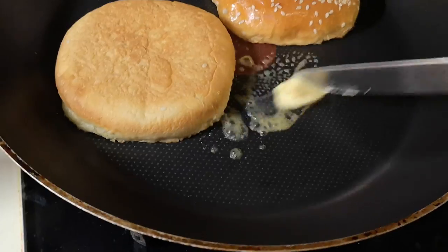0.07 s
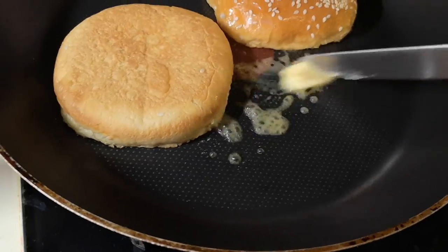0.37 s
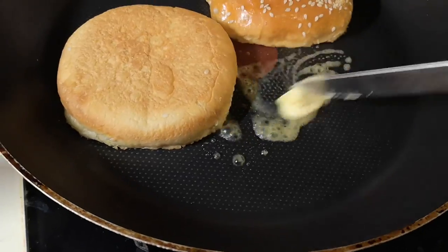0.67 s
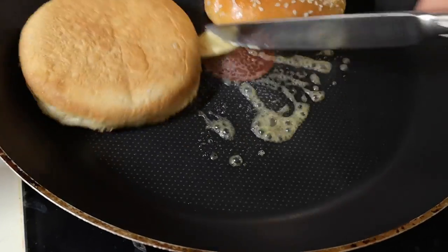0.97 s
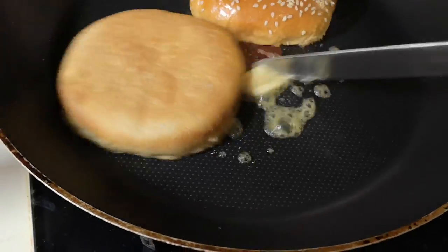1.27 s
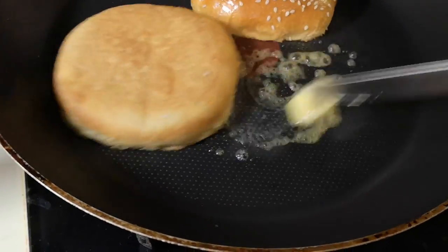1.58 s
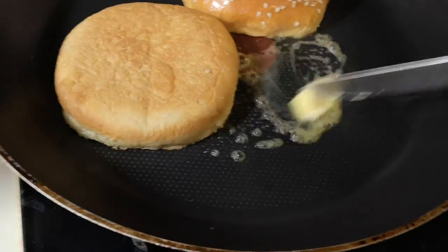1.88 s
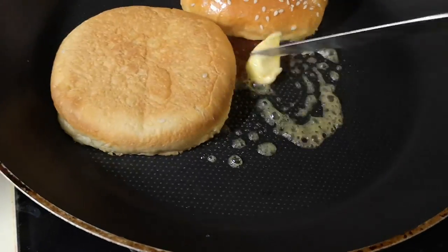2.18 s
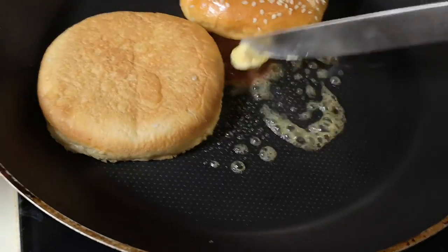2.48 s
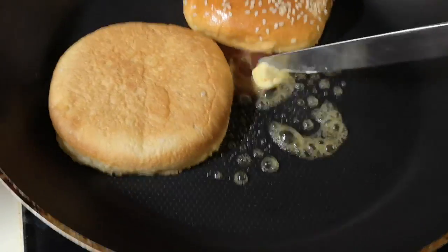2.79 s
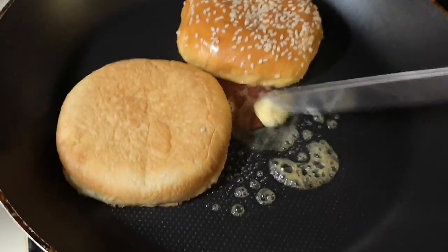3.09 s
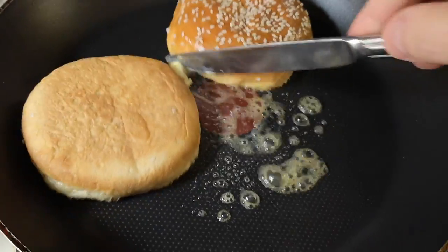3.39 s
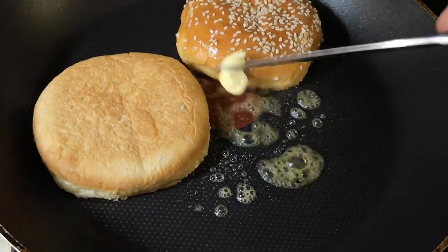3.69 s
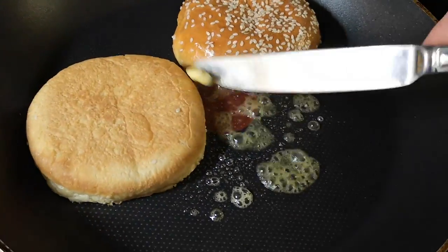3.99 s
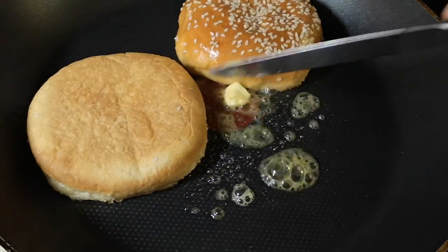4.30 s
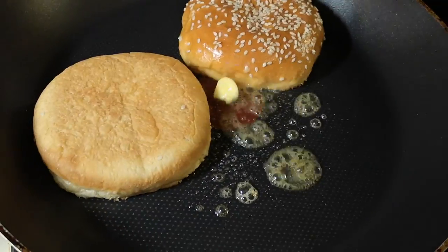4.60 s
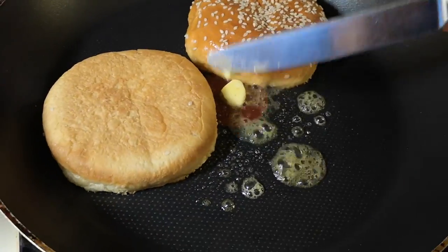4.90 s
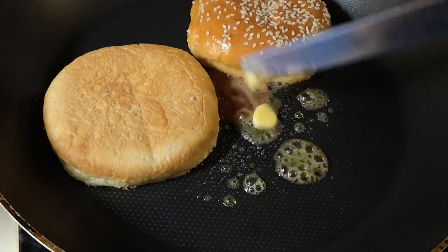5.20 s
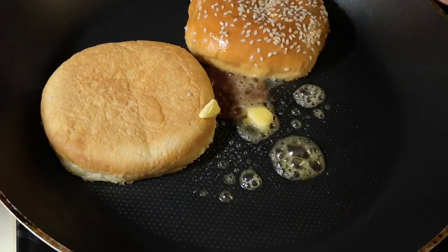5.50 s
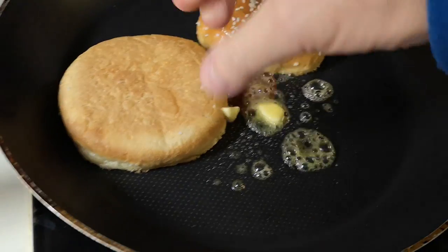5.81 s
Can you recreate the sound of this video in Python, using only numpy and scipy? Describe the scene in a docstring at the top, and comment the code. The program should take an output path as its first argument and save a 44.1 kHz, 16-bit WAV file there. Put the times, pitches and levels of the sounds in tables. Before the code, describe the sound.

Heard from close by in stereo, butter bubbles and crackles in a hot frying pan, flaring slightly as it is pushed around, with small irregular pops throughout. The low hum and airy fan of an electric hob fill the small kitchen underneath. In the second half come two quick knocks of a knife on the pan, ringing only briefly, after which the frying settles a little and a very low rumble rises and fades.

```python
"""Butter frying in a pan

A small kitchen, a stereo microphone close to an electric hob. Butter sizzles as a knife pushes it
about between two buns: tiny steam bubbles burst in the fat and bigger ones spit. Underneath, the hob
hums, its cooling fan blows and a deep rumble swells once. Twice the knife work knocks the pan."""
import sys
import numpy as np
from scipy import signal
from scipy.fft import rfft, irfft, next_fast_len
from scipy.io import wavfile

SR = 44100
rng = np.random.default_rng(int(sys.argv[2]) if len(sys.argv) > 2 else 0)


def put_to_file(sound):
    """Save the sound as 16-bit audio at rate SR, in the file named by the first command-line argument."""
    columns = np.atleast_2d(sound).T  # one column per channel
    safe = np.clip(columns, -1, 1)
    whole_steps = np.round(safe * 32767)
    wavfile.write(sys.argv[1], SR, whole_steps.astype(np.int16))


N = 257632
T = np.arange(N) / SR


def from_db(db):
    """Decibels to gain."""
    return 10 ** (np.asarray(db) / 20)


def rms_one(x):
    """Scale to rms 1."""
    return x / np.sqrt(np.mean(x ** 2) + 1e-20)


def in_time(rows):
    """One curve for each column after the time, its points joined by straight lines."""
    times, *columns = np.transpose(rows)
    return [np.interp(T, times, column) for column in columns]


def panned(pan_db):
    """Left and right gains of constant power; pan is left minus right in dB."""
    gains = from_db(np.array([[.5], [-.5]]) * pan_db)
    return gains / np.sqrt(np.mean(gains ** 2, axis=0))


def coloured(x, spectrum):
    """Shape a sound by a smooth spectrum of (Hz, dB) points; rms 1."""
    hz, db = np.transpose(spectrum)
    size = next_fast_len(N)
    log_hz = np.log(np.maximum(np.fft.rfftfreq(size, 1 / SR), 1))
    gain = from_db(np.interp(log_hz, np.log(hz), db, left=-100, right=-100))
    return rms_one(irfft(rfft(x, size) * gain, size)[..., :N])


def drift(rate_hz):
    """A slow random wander of rms 1, drawn every 100 samples."""
    pole = np.exp(-200 * np.pi * rate_hz / SR)
    steps = rng.standard_normal(N // 100 + 1002)
    slow = signal.lfilter([1], [1, -2 * pole, pole * pole], steps)[1000:]
    return np.interp(np.arange(N) / 100, np.arange(len(slow)), rms_one(slow))


def bump(peak_s, half_length_s):
    """A smooth rise and fall of height 1."""
    return np.exp(-((T - peak_s) / half_length_s) ** 2)


def resonance(x, hz, width_hz):
    """A two-pole resonance with gain 1 at its peak."""
    radius = np.exp(-np.pi * width_hz / SR)
    feedback = [1, -2 * radius * np.cos(2 * np.pi * hz / SR), radius ** 2]
    return signal.lfilter(np.array([1, 0, -1]) * (1 - radius ** 2) / 2, feedback, x + 1e-18)


def add(out, start_s, sound):
    """Mix a short stereo sound in."""
    i = max(round(start_s * SR), 0)
    out[:, i:i + sound.shape[1]] += sound[:, :max(N - i, 0)]


def echoes(x, t60, gap_s):
    """Diffuse reflections that start after a gap and die away, different in each channel."""
    t = T[:SR // 2]
    tail = rng.standard_normal((2, len(t))) * from_db(-60 * t / t60) * (t > gap_s)
    tail /= np.sqrt(np.sum(tail ** 2, axis=1, keepdims=True))
    return signal.fftconvolve(x, tail, axes=1)[:, :N]


# In the pan, the butter fries steadily while the knife feeds it, then settles.
# Each row: time in seconds, relative sizzle level in dB, fine fizz level in dB.
SIMMER = [(0, -43, -51), (1.5, -43.5, -51), (3.6, -43.5, -51), (4.0, -45, -52.5), (5.84, -45, -52)]
# The knife wipes fresh butter over hot metal and the frying flares.
# Each row: peak time in seconds, half length in seconds, sizzle rise in dB, fizz rise in dB.
FLARES = [(0.19, 0.08, 1.57, 3.5), (0.421, 0.06, 2, 0), (1.1, 0.04, 0.85, 1), (1.84, 0.12, 1.86, 4.5),
          (3.64, 0.08, 2, 3)]


def frying_levels():
    """Levels of the sizzle and its fine fizz in dB: the simmer, lifted by each flare."""
    sizzle_db, fizz_db = in_time(SIMMER)
    for peak_s, half_length_s, sizzle_rise_db, fizz_rise_db in FLARES:
        flare = bump(peak_s, half_length_s)
        sizzle_db += sizzle_rise_db * flare
        fizz_db += fizz_rise_db * flare
    return sizzle_db, fizz_db


def bursts(per_s, size_db, sharpness, clump_db, pitch_count=24):
    """Bubbles burst in clumps; each rings a few cycles and reaches the two channels unevenly."""
    out = np.zeros((2, N))
    born = np.flatnonzero(rng.random(N) < per_s * from_db(clump_db * drift(25)) / SR)
    size, polarity, side, delay, pitch = rng.random((len(born), 5)).T
    strength = from_db(size_db * np.minimum(-np.log(1 - size), 4.5)) * np.sign(polarity - .5)
    left, right = panned(14 * (side - .5)) * strength
    lag = ((delay - .5) * .0005 * SR).astype(int)
    for k, hz in enumerate(np.linspace(2600, 15200, pitch_count)):
        at_pitch = (pitch * pitch_count).astype(int) == k
        clicks = np.zeros((2, N))
        clicks[0, born[at_pitch]] = left[at_pitch]
        clicks[1, np.clip(born[at_pitch] + lag[at_pitch], 0, N - 1)] = right[at_pitch]
        out += rms_one(resonance(clicks, hz, width_hz=500 + hz / sharpness))
    return rms_one(out)


# The colour of the bursting bubbles, close up. Each row: frequency in Hz, relative level in dB.
SIZZLE_SPECTRUM = [(1710, -35), (2900, -6), (4120, -7), (5310, 0.5), (6350, 0), (7590, 4.5), (8420, -2),
                   (9270, 0.5), (10200, -3.5), (15000, -6.5)]
# Where the butter lies, a little left of the microphone. Each row: time in seconds, pan in dB.
BUTTER_POSITION = [(0, 5), (0.3, 7.5), (0.6, 3), (1.6, 1.8), (3.7, 3), (5.84, 4)]


def sizzle(crackle_db=-3.0, diffuse_db=-13):
    """A bed of countless tiny bursts under sparser crackle; freshly spread butter fizzes brighter."""
    sizzle_db, fizz_db = frying_levels()
    pan_db, = in_time(BUTTER_POSITION)
    activity = from_db(sizzle_db - sizzle_db.mean())
    bed = bursts(per_s=11000 * activity, size_db=2.0, sharpness=4.8, clump_db=1.8)
    crackle = bursts(per_s=900 * activity, size_db=3.5, sharpness=11, clump_db=3)
    bubbles = bed + from_db(crackle_db) * crackle
    hiss = from_db(diffuse_db) * rng.standard_normal((2, N))   # the kitchen blurs the bursts
    reflections = from_db(-5.5) * echoes(bubbles, t60=0.044, gap_s=0.00101)
    fat = coloured(bubbles + reflections + hiss, SIZZLE_SPECTRUM)
    fizz = signal.sosfiltfilt(signal.butter(4, 8500, "high", fs=SR, output="sos"), fat)
    body = from_db(sizzle_db - 1.14) * rms_one(fat - fizz) * panned(pan_db + .7)
    return body + from_db(fizz_db) * rms_one(fizz) * panned(.4 * pan_db - 4.0)


# Motor, mains and fan tones from the hob, under the pan.
# Each row: frequency in Hz, rms level in dB, unsteadiness as a share of the amplitude.
HUM_TONES = [(38.4, -59, 0.11), (44.54, -49.5, 0.07), (100.8, -39.5, 0.076), (201.3, -51, 0.13),
             (234.5, -59, 0.56), (453, -68, 0.45), (482, -61, 0.91), (972.5, -59.5, 0.56)]


def hob_hum(opposed_hz=520):
    """Two motors beat under the mains hum; short waves reach the two channels in opposite phase."""
    out = np.zeros((2, N))
    for hz, db, unsteadiness in HUM_TONES:
        waver = 1 + unsteadiness * (drift(2.3) + 1j * drift(0.96))   # in both level and phase
        phase_gap = np.pi * min(1, (hz / opposed_hz) ** 2.57)
        phase = 2 * np.pi * hz * T + np.angle(waver) + np.array([[.5], [-.5]]) * phase_gap
        out += np.sqrt(2) * from_db(db) * rms_one(np.abs(waver)) * np.cos(phase)
    return out


# Four spectra of the running hob, from close by. Each row: frequency in Hz, relative level in dB.
HOB_RUMBLE = [(12, 5), (28, -17), (34, 3), (50, -0.5), (57, -5), (64, -3), (72, -5.5), (90, -5.5),
              (115, -4.5), (140, -4.5), (175, -2.5), (215, -12), (255, -17.5), (335, -12.5), (410, -24),
              (600, -55)]   # low, dead centre
FAN_MID = [(330, -36), (420, -13), (520, -12.5), (660, -10), (740, -6.5), (870, -8), (1050, -7), (1300, -8),
           (1550, -3.5), (1950, -6.5), (2450, -7.5), (3000, -13.5), (3700, -10), (5000, -24)]   # the rush of air that both channels share
FAN_SIDE = [(900, -17), (1200, -13), (1500, -8), (1850, -7), (2300, -6.5), (2550, -9), (2760, -9),
            (2900, -32), (3700, -14.5), (5000, -11.5)]   # the rush in which they differ
ROOM_AIR = [(25, -27), (60, -47), (105, -23.5), (200, 17.5), (275, -3), (370, 12), (470, -3), (660, 9),
            (820, 6.5), (1100, 0), (1500, -25)]   # low fan air that fills the kitchen
# Resonances of the ducts under the hob.
# Each row: frequency in Hz, width in Hz, mid level in dB, side level in dB.
DUCT_RESONANCES = [(1778, 160, -56, -68), (1960, 220, -59.5, -54), (2106, 160, -61.5, -55),
                   (2707, 76, -61.5, -65)]


def cooling_fan(rumble_db=-41.5, mid_db=-50.5, side_db=-50.0, room_air_db=-53.5):
    """Air rushes through the ducts under the hob and spreads through the kitchen."""
    noise = rng.standard_normal((4, N))
    noise[:2] += from_db(-9.0) * echoes(noise[:2], t60=0.16, gap_s=.003)   # ripples the spectrum
    mid = from_db(mid_db) * coloured(noise[0], FAN_MID)
    side = from_db(side_db) * coloured(noise[1], FAN_SIDE)
    side += from_db(room_air_db) * coloured(noise[2], ROOM_AIR)
    rumble = from_db(rumble_db) * coloured(noise[3], HOB_RUMBLE)
    for hz, width_hz, duct_mid_db, duct_side_db in DUCT_RESONANCES:
        duct_mid, duct_side = rms_one(resonance(rng.standard_normal((2, N)), hz, width_hz))
        mid += from_db(duct_mid_db) * duct_mid
        side += from_db(duct_side_db) * duct_side
    return rumble + np.array([mid + side, mid - side]) * panned(pan_db=0.94)


def deep_rumble(rest_db=-49.5, top_db=-37):
    """A narrow band of noise at the bottom of hearing lies under everything and swells once."""
    level = from_db(rest_db + (top_db - rest_db) * bump(peak_s=4.89, half_length_s=0.39))
    return level * coloured(rng.standard_normal(N), [(14, -17), (22, -16), (30, -25)])


def small_spits(per_s=7, centre_hz=8100, spread_octaves=0.24, ring_cycles=19, count=80):
    """Lesser bubbles spit by chance and weaken as the sizzle does; rows as in BIG_SPITS."""
    sizzle_db, _ = frying_levels()
    wait, snap = rng.random((count, 2)).T
    size, pitch, side = rng.standard_normal((count, 3)).T
    start_s = np.cumsum(-np.log(1 - wait)) / per_s
    sizzle_swing_db = np.interp(start_s, T, sizzle_db - sizzle_db.mean())
    db = -33.5 + 3.5 * size + 0.29 * sizzle_swing_db
    hz = centre_hz * 2 ** (spread_octaves * pitch)
    rows = np.transpose([start_s, db, hz, ring_cycles / hz, .7 * snap, 4 + side])
    return list(rows[start_s < T[-1]])


# The biggest bubbles, spitting close to the microphone. Each row: start in seconds, relative level
# in dB, pitch in Hz, time to fade by 60 dB in seconds, share of snap from 0 to 1, pan in dB.
BIG_SPITS = [(0.0375, -29, 6020, 0.016, 0.05, 12), (0.1723, -25, 9860, 0.0029, 0.3, -10),
             (0.2727, -25, 5800, 0.006, 0.3, 13), (0.3553, -25, 6720, 0.0064, 0.05, 13),
             (0.4095, -26.5, 8400, 0.0081, 0.1, 9), (0.533, -27, 8300, 0.003, 0.8, -6),
             (0.856, -27, 7640, 0.007, 0.1, 1), (0.862, -25, 6100, 0.008, 0.1, 6),
             (0.934, -21, 5500, 0.005, 0, 9), (1.0673, -32, 5700, 0.01, 0.3, -3),
             (1.5168, -30, 9450, 0.008, 0.06, -17), (1.6965, -28, 9300, 0.0057, 0.6, 3),
             (2.1126, -25, 8960, 0.0017, 0.62, -1), (2.1932, -26.5, 6100, 0.006, 0.05, 6),
             (2.3811, -28.5, 9450, 0.0097, 0.55, -6), (2.5915, -22, 8200, 0.0019, 0.35, 2),
             (2.71, -27, 5630, 0.005, 0.4, 6), (2.7129, -24.5, 5900, 0.0027, 0.36, 1),
             (2.7518, -28.5, 7500, 0.0087, 0, 7), (2.921, -24, 7490, 0.0036, 0.6, 0),
             (3.5109, -30, 6560, 0.0083, 0.07, 2), (3.6571, -24.5, 8600, 0.0041, 0.23, -3),
             (3.7976, -17.5, 7160, 0.0021, 0.6, 1), (4.284, -21, 5400, 0.0037, 0.05, 9),
             (4.7578, -25, 5330, 0.0038, 0.24, 5), (4.765, -24, 6200, 0.0041, 0, 0),
             (4.868, -29.5, 5165, 0.0075, 0.25, 9), (5.1696, -31.5, 5560, 0.0038, 0.28, 1),
             (5.238, -29, 8100, 0.004, 0.29, 2)]


def spits(gain_db=3, snap_db=5, wall_db=-11, room_db=-21):
    """The film of a big bubble snaps, its cavity rings, and the pan wall throws the sound back."""
    out, t = np.zeros((2, N)), T[:SR // 40]
    age = np.maximum(t - np.array([[0], [.00002]]), 0)   # the right channel is a little farther away
    snap = np.sin(2 * np.pi * 7400 * age) * from_db(snap_db - 60 * age / 0.0006)
    attack = 1 - np.exp(-age / .00004)
    for start_s, db, hz, t60, snap_share, pan_db in BIG_SPITS + small_spits():
        cavity = np.sin(2 * np.pi * hz * age) * from_db(-60 * age / t60) * attack
        spit = np.sqrt(1 - snap_share) * cavity + np.sqrt(snap_share) * snap
        add(out, start_s, from_db(db + gain_db) * panned(pan_db) * spit)
    out = signal.sosfilt(signal.butter(2, 2600, "high", fs=SR, output="sos"), out + 1e-18)
    wall = from_db(wall_db) * echoes(out, t60=.02, gap_s=0.002)
    room = from_db(room_db) * echoes(out, t60=0.4, gap_s=0.0067)
    return out + wall + room


# Two knocks of the knife at close range, three quick contacts each. Each row: start in seconds,
# strength in dB, place from 0 (the pan's floor) to 1 (its rim), left minus right in dB.
KNIFE_KNOCKS = [(3.6418, -5, 0.0068, 9), (3.6452, -10, 0.39, -9), (3.6525, -14, 0.096, -10),
                (4.2033, 2.5, 0.88, -5.5), (4.2128, -8, 1, -3), (4.2172, -1.5, 0.56, 29)]
# The modes of the loaded pan on the hob. Each row: frequency in Hz, time to fade by 60 dB in seconds,
# relative level in dB struck on the floor, the same at the rim, phase between channels in radians.
PAN_MODES = [(486, 0.14, -49, -35, .4), (530, 0.071, -29.5, -50, .3), (805, 0.034, -15.5, -41, 0.45),
             (860, 0.057, -23, -49, .6), (910, 0.43, -42, -52, 0.33), (990, 0.26, -38, -50, 0.43),
             (1070, 0.03, -23, -38, 1.08), (1820, 0.14, -42, -53, 1.6), (2020, 0.017, -28, -22, 0.37),
             (2304, 0.038, -28, -45, 1.2), (2590, 0.015, -32, -40, 1.2), (3150, 0.024, -41, -37, 1.2),
             (3550, 0.075, -55, -36.5, 1.2)]


def knife_knocks(room_db=-5, rattle_db=-39, rattle_t60=0.05):
    """The pan rings briefly; the place of the blow sets each mode's share, and the blade chatters."""
    out, t = np.zeros((2, N)), T[:SR // 5]
    blade_band = signal.butter(3, [900, 3600], "band", fs=SR, output="sos")
    attack = 1 - np.exp(-t / 0.00042)
    for start_s, db, place, pan_db in KNIFE_KNOCKS:
        ring = np.zeros((2, len(t)))
        for hz, t60, floor_db, rim_db, phase in PAN_MODES:
            envelope = from_db(floor_db + place * (rim_db - floor_db) - 60 * t / t60)
            ring += envelope * np.sin(2 * np.pi * hz * t + np.array([[0], [phase]]))
        chatter = rms_one(signal.sosfilt(blade_band, rng.standard_normal((2, len(t)))))
        rattle = chatter * from_db(rattle_db - 60 * t / rattle_t60)
        add(out, start_s, from_db(db) * panned(pan_db) * (ring + rattle) * attack)
    return out + from_db(room_db) * echoes(out, t60=0.29, gap_s=0.0044)


def scene():
    """The pan over the running hob."""
    return sizzle() + spits() + knife_knocks() + hob_hum() + cooling_fan() + deep_rumble()


def record(dry):
    """The treble is cut steeply above 15250 Hz."""
    return signal.sosfilt(signal.ellip(10, .1, 80, 15250, fs=SR, output="sos"), dry)


dry = scene()
out = record(dry)
put_to_file(out)
```